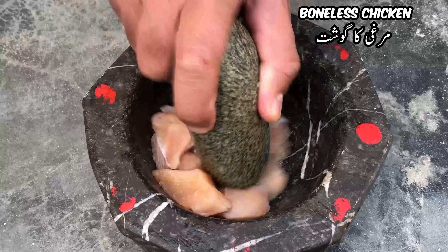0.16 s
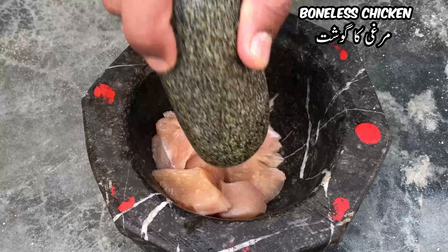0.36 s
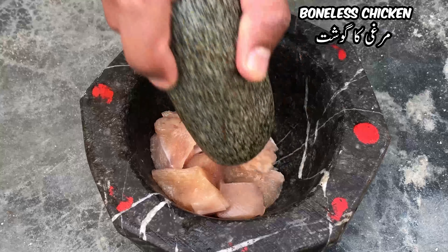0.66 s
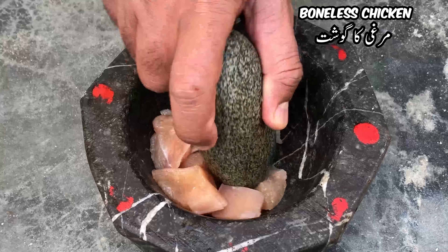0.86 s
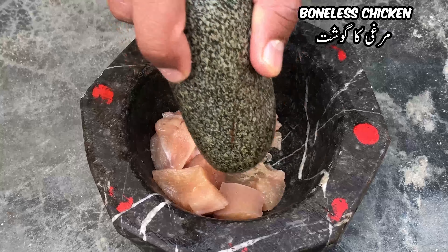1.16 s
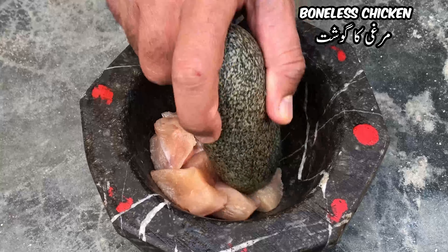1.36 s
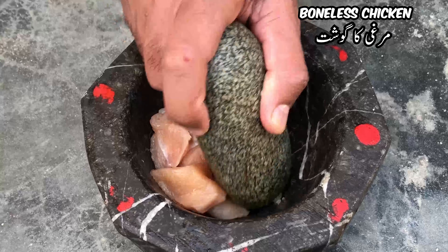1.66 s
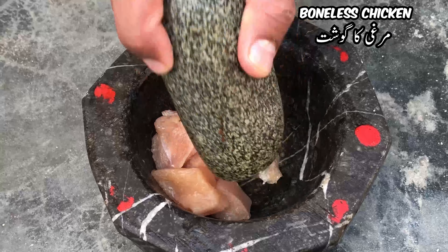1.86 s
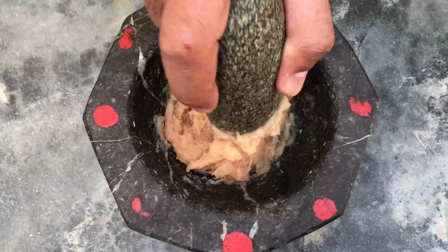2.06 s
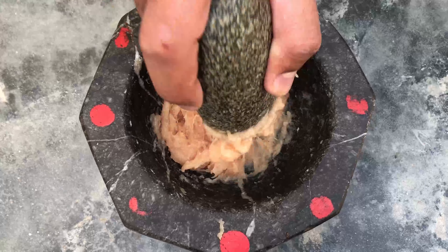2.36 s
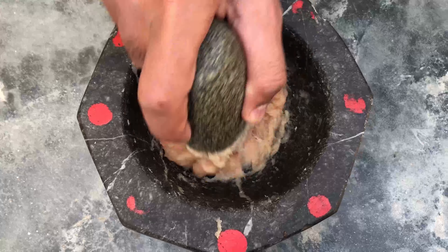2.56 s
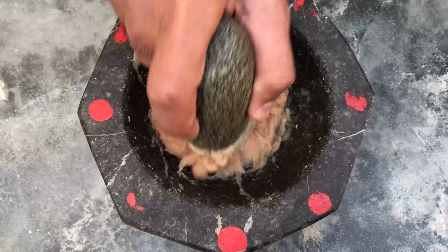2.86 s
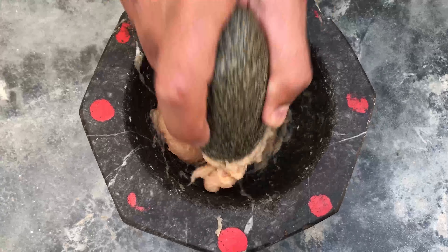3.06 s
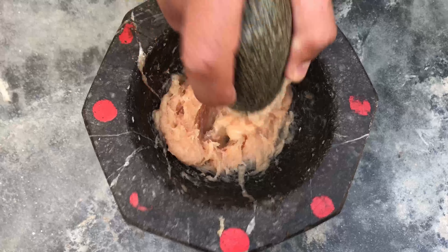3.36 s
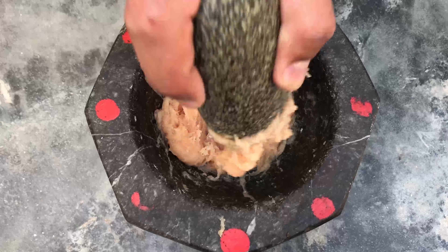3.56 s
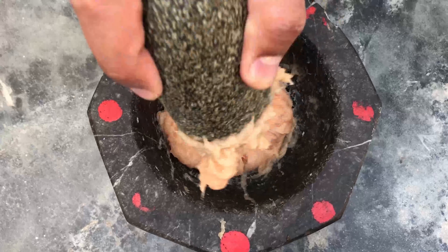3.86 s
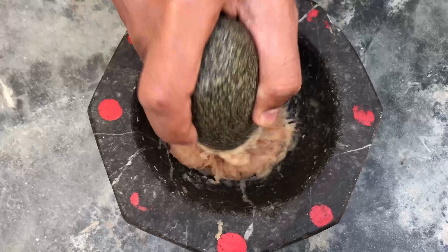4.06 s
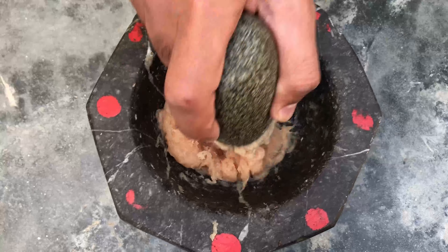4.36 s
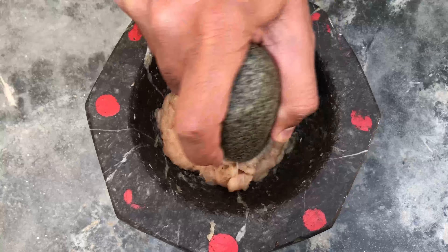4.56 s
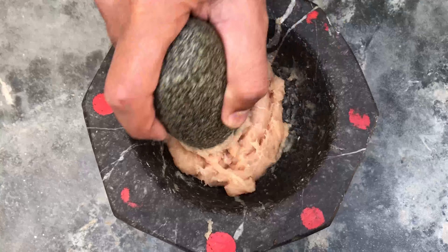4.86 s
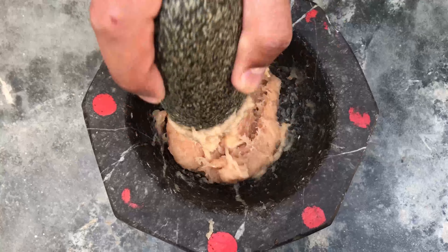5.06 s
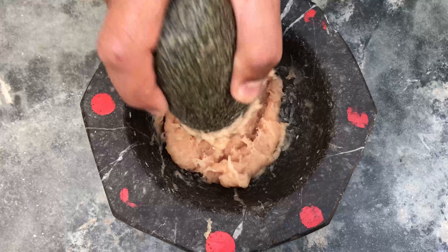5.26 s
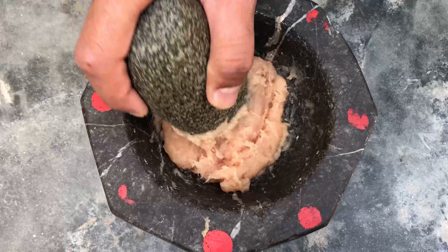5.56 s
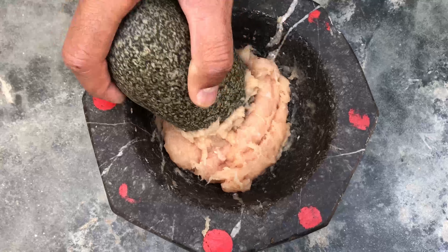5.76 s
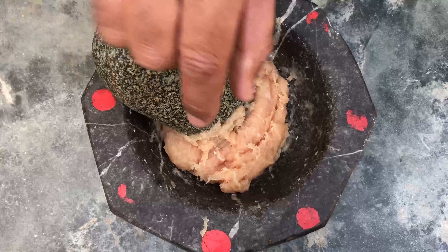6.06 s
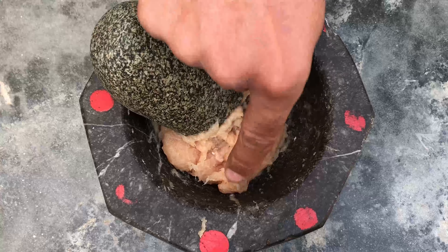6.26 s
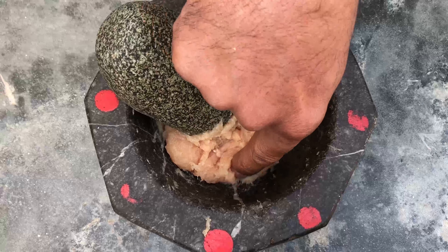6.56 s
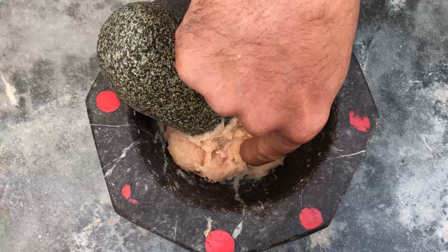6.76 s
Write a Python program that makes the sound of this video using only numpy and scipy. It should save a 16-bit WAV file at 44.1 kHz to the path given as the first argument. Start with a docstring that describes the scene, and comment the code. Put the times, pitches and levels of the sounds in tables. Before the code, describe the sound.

Steady, uneven pounding in a heavy stone bowl, heard from very near. Sharp juicy splats come first, with softer squishes and sticky peeling between, and a thin hiss behind. After two seconds the background is much quieter and stone knocks on stone, solid and dry, sometimes ringing briefly. Small air pockets plop in the paste. The last blows give way to fading taps, then faint wet clicks; the room answers only briefly.

```python
"""A stone pestle pounds raw chicken in a stone mortar, close up, at first over a faint fluttering hiss
and hum, about three strokes a second. Each stroke splats into the wet meat (noise crackle), squelches,
pops trapped air (short hollow plops) and peels free; the hard ones break through to the bowl, knock
stone on stone (filtered clicks) and ring the pestle (decaying sines). The kitchen answers briefly."""
import sys
import numpy as np
from scipy import signal
from scipy.fft import rfft, irfft, next_fast_len
from scipy.io import wavfile
from scipy.ndimage import map_coordinates

SR = 44100
rng = np.random.default_rng(int(sys.argv[2]) if len(sys.argv) > 2 else 0)


def transcribe(u):
    """Save the signal u as a 16-bit wav file named by the first command-line argument.

    u: samples, shape (n,) or (channels, n), limited to [-1, 1]; the rate is SR.
    q: integer samples, one column per channel.
    """
    v = np.clip(np.atleast_2d(u).T, -1, 1)
    q = np.round(v * 32767).astype(np.int16)
    wavfile.write(sys.argv[1], SR, q)


N = 304290
T = np.arange(N) / SR
FIRM_DB = -25  # level of a firm stroke or peel, the reference for its length


def amp(db):
    """Decibels to gain."""
    return 10 ** (np.asarray(db) / 20)


def unit(x):
    """Scaled to rms 1."""
    return x / np.sqrt(np.mean(x ** 2) + 1e-20)


def peak_at(x, db):
    """Scaled to this peak level."""
    return amp(db) * x / np.abs(x).max()


def along(points, hz):
    """(Hz, value) points read on a log frequency axis."""
    f, v = np.transpose(points)
    return np.interp(np.log(hz + 1), np.log(f), v)


def filtered(x, response):
    """x through a response given as a function of frequency."""
    size = next_fast_len(len(x) + SR // 4)
    hz = np.fft.rfftfreq(size, 1 / SR)
    return irfft(rfft(x, size) * response(hz), size)[:len(x)]


def impulse(gain, size=2048):
    """Minimum-phase click of energy 1 with this gain over frequency."""
    log_gain = np.log(np.maximum(gain(np.fft.rfftfreq(size, 1 / SR)), 1e-6))
    cepstrum = irfft(log_gain)
    # folding the cepstrum makes the click causal
    cepstrum[1:size // 2] *= 2
    cepstrum[size // 2 + 1:] = 0
    click = irfft(np.exp(rfft(cepstrum)))
    return click / np.linalg.norm(click)


def tilted(spectrum, tilt_db):
    """Click with this spectrum, tilted from -tilt_db at 1.5 kHz to +tilt_db at 9 kHz."""
    shelf = [(1500, -tilt_db), (9000, tilt_db)]
    return impulse(lambda hz: amp(along(spectrum, hz) + along(shelf, hz)))


def resonance(hz, centre_hz, gain_db, octaves):
    """Gain of a broad peak."""
    return amp(gain_db * np.exp(-(np.log2((hz + 1) / centre_hz) / octaves) ** 2))


def dispersed(click, lag_s):
    """Bending waves carry the lows more slowly, so a click falls in pitch; lag_s is the delay at 1 kHz."""
    return filtered(click, lambda hz: np.exp(-4j * np.pi * lag_s * np.sqrt(1000 * hz)))


def add(track, s, sound):
    """Mix a sound in from time s."""
    start = max(round(s * SR), 0)
    part = track[start:start + len(sound)]
    part += sound[:len(part)]


def noise(spectrum):
    """Coloured noise of rms 1."""
    white = rng.standard_normal(N)
    return unit(filtered(white, lambda hz: amp(along(spectrum, hz))))


def crackle(size, rate_hz, scatter_db):
    """Sparse impulses of random sign and uneven strength, rms 1."""
    hits = rng.random(size) < rate_hz / SR
    signs = rng.choice([-1, 1], size)
    strength = amp(scatter_db * rng.standard_normal(size).clip(-2, 2))
    return unit(hits * signs * strength)


# hum tones: pitch_hz, level_db (peak)
HUM_TONES = [(495, -102.5), (690, -94.5)]


def hum(stop_s=2.03, fade_s=0.025, waver_cycles=0.42):
    """Faint sines share a random phase drift and stop early on."""
    drift = waver_cycles * map_coordinates(rng.standard_normal(100), [12 * T])
    tones = sum(amp(db) * np.sin(2 * np.pi * (hz * T + drift)) for hz, db in HUM_TONES)
    return tones * np.clip((stop_s - T) / fade_s, 0, 1)


# hiss levels before the trims in hiss(), early and late: time_s, middle_db, treble_db
HISS_EARLY = [(0.0, -66.5, -69), (0.12, -68, -67.5), (0.38, -59.5, -62.5), (0.54, -67, -64.5),
              (0.74, -61.5, -59.5), (0.93, -60.5, -64.5), (1.14, -59.5, -62.5), (1.31, -58.5, -54.5),
              (1.54, -63, -61.5), (1.62, -61.5, -56.5), (1.74, -63, -58.5), (1.85, -67, -73),
              (1.98, -66, -69.5), (2.12, -82.5, -82.5)]
HISS_LATE = [(6.0, -79, -78), (6.348, -67.5, -72.5), (6.452, -79.5, -72.5), (6.696, -89, -82),
             (6.9, -84, -84.5)]
# spectra of the hiss middle, hiss treble and still air: freq_hz, gain_db
BODY = [(30, -50), (200, -38.5), (400, -32), (700, -18.5), (1100, -8), (1700, 0.5), (2600, 1), (3800, 4),
        (6000, -1.5), (9000, -10.5), (16000, -33.5)]
FIZZ = [(30, -55), (2000, -25.5), (5000, -10.5), (8000, -6), (11000, 0), (14500, 0.5), (16000, -6)]
AIR = [(30, -41), (200, -37.5), (450, -24.5), (800, -12.5), (1300, -3), (2000, -0.5), (3500, -8),
       (7000, -11), (16000, -13)]


def hiss(body_trim_db=-1, fizz_trim_db=1, air_db=-77, flutter_db=2.24, ticks_db=-9,
         rest_s=(2.2, 5.1), rest_middle_db=-76.5, rest_treble_db=-80):
    """Two noise bands swell and flutter, flecked with wet ticks, over the still air of the kitchen."""
    rest = [(s, rest_middle_db, rest_treble_db) for s in rest_s]
    s, *columns = np.vstack([HISS_EARLY, rest, HISS_LATE]).T
    body_db, fizz_db = [np.interp(T, s, column) for column in columns]
    flutter = flutter_db * map_coordinates(rng.standard_normal(300), [40 * T])  # 40 random points a second
    flecks = crackle(N, rate_hz=160, scatter_db=5)
    ticks = amp(ticks_db) * unit(filtered(flecks, lambda hz: amp(along(PEEL, hz))))
    middle = amp(body_db + body_trim_db + flutter) * (noise(BODY) + ticks)
    treble = amp(fizz_db + fizz_trim_db + flutter / 2) * noise(FIZZ)
    return middle + treble + amp(air_db) * noise(AIR)


# bands of hiss: centre_s, level_db, centre_hz, width_hz, spread_s
HISS_BANDS = [(.03, -63, 1610, 1170, 0.059), (1.246, -58, 4160, 2580, 0.048),
              (1.978, -72, 5640, 600, 0.025), (3.49, -62.5, 4440, 1084, 0.068),
              (5.2, -59.5, 4375, 2260, 0.052), (5.29, -58, 3646, 858, 0.056)]


def hiss_bands():
    """Faint Gaussian swells of band-limited hiss."""
    out = np.zeros(N)
    for s, db, centre_hz, width_hz, spread_s in HISS_BANDS:
        white = rng.standard_normal(N)
        band = unit(filtered(white, lambda hz: 1 / (1 + (2 * (hz - centre_hz) / width_hz) ** 4)))
        out += amp(db) * band * np.exp(-((T - s) / spread_s) ** 2 / 2)
    return out


# squeak glide: time_s, pitch_hz, level_db
SQUEAK = [(0.352, 1650, -83), (0.471, 1673, -71), (.62, 1680, -77), (.695, 1705, -60.5), (.76, 1900, -67),
          (1.051, 1800, -74), (1.2, 1800, -86)]


def squeak(width_hz=220):
    """A faint, rough squeak: narrow noise on a carrier that glides up, then partly back, and fades."""
    s, *columns = np.transpose(SQUEAK)
    centre_hz, db = [np.interp(T, s, column) for column in columns]
    slow = lambda: filtered(rng.standard_normal(N), lambda hz: 1 / (1 + (2 * hz / width_hz) ** 4))
    phase = 2 * np.pi * np.cumsum(centre_hz) / SR
    band = unit(slow() * np.cos(phase) + slow() * np.sin(phase))
    return amp(db) * band * (T > s[0]) * (T < s[-1])


# colours of the early scatter and tail, and of the slap: freq_hz, gain_db
ECHO = [(100, -2.5), (300, -4.5), (480, 9), (700, 7.5), (1100, -6), (1700, -5.5), (2300, -6), (4000, -12.5),
        (7000, -3), (16000, -12)]
SLAP = [(100, -10.5), (900, -10.5), (1700, 0.5), (2400, -4.5), (4500, -9.5), (16000, -9.5)]
# tail decay: freq_hz, t60_s
ROOM = [(200, .42), (1500, 0.57), (4000, 0.61), (12000, 0.34)]


def room(x, early_db=-16, early_s=0.032, slap_db=-20, slap_s=.0228, slap_spread_s=.0035, tail_db=-23):
    """Nearby scatter, a short slap echo and a weak tail as noise responses, redrawn every third of a second."""
    out, size, block = np.zeros(N), SR // 2, SR // 3
    t = np.arange(size) / SR
    echo, slap_colour = tilted(ECHO, 0), tilted(SLAP, 0)
    # each part has energy 1 before its level
    coloured = lambda v, colour: unit(signal.fftconvolve(v, colour)[:size]) / np.sqrt(size)
    for start in range(0, N, block):
        hz, when, z = signal.stft(rng.standard_normal(size), SR, nperseg=256)
        decay = amp(-60 * when / along(ROOM, hz)[:, None])
        tail = signal.istft(z * decay, SR, nperseg=256)[1][:size]
        tail = tail * (1 - np.exp(-t / 0.005))
        early = rng.standard_normal(size) * np.exp(-t / early_s) * (t > .002)
        slap = rng.standard_normal(size) * np.exp(-np.abs(t - slap_s) / slap_spread_s)
        answer = amp(early_db) * coloured(early, echo)
        answer += amp(tail_db) * coloured(tail, echo)
        answer += amp(slap_db) * coloured(slap, slap_colour)
        add(out, start / SR, signal.fftconvolve(x[start:start + block], answer))
    return out


# louder sticky films: start_s, level_db (peak before the trim), tilt_db
SNAPS = [(1.020, -33, 0.5), (1.369, -29, 7), (1.803, -32, 0.5), (2.188, -35, -1), (2.2368, -30.5, 39),
         (2.5553, -19, 6), (2.763, -24, 0.5), (4.617, -28, 1.5), (4.640, -26, -3), (4.754, -44.5, -10),
         (5.190, -28, -7.5), (5.983, -42, -6.5), (6.453, -43.5, -5.5), (6.508, -36.5, 13),
         (6.517, -36.5, 18), (6.603, -38, 18), (6.671, -42.5, 12)]


def snaps(trim_db=-2, trail_db=-13, trail_s=.002, faint_db=-52, faint_tilt_db=-3, scatter_db=3, count=20):
    """Films of juice snap: a click with a crackling trail; louder ones, and faint ones at any time."""
    out, t = np.zeros(N), np.arange(SR // 40) / SR
    faint = [(rng.random() * N / SR, faint_db + scatter_db * rng.standard_normal(), faint_tilt_db)
             for _ in range(count)]
    for s, db, tilt_db in [*SNAPS, *faint]:
        burst = amp(trail_db) * crackle(len(t), rate_hz=2000, scatter_db=7.5) * np.exp(-t / trail_s)
        burst[0] = 1
        snap = signal.fftconvolve(burst, tilted(PEEL, tilt_db))
        add(out, s, peak_at(snap, db + trim_db))
    return out


# air pockets, and a faint finger touch at 6.455 s: start_s, level_db (peak before the trim)
POPS = [(1.316, -55.5), (1.336, -54.5), (1.667, -59), (1.681, -47.5), (1.696, -58.5), (2.191, -51),
        (2.21, -57), (2.227, -53.5), (2.495, -56.5), (2.523, -56), (4.285, -46), (4.353, -27.5),
        (4.665, -48), (4.836, -51.5), (4.863, -57), (5.137, -38), (6.455, -66.5)]
# plop spectrum: freq_hz, gain_db
PLOP = [(30, -70), (150, -61), (280, -40.5), (450, -19), (600, -9), (800, -10), (1020, 3), (1250, -8),
        (1600, -19.5), (2100, -41.5), (5000, -60.5)]


def pops(trim_db=-1, rebound_s=0.006, rebound_db=-11, mashed_s=2,
         small_db=-61.5, scatter_db=3, after_s=0.033, within_s=.12, count=3):
    """An air pocket bursts with a hollow plop of a few cycles; its walls slap shut as a weaker second plop."""
    out = np.zeros(N)
    plop = peak_at(impulse(lambda hz: amp(along(PLOP, hz))), trim_db)
    # small pockets burst soon after a landing, once the meat has turned to paste
    landings = [s for s, *_ in STROKES if s > mashed_s]
    small = [(s + after_s + within_s * rng.random(), small_db + scatter_db * rng.standard_normal())
             for s in landings for _ in range(count)]
    for s, db in [*POPS, *small]:
        add(out, s, amp(db) * plop)
        shut_s = np.exp(0.28 * rng.standard_normal()) * rebound_s
        add(out, s + shut_s, amp(db + rebound_db) * plop)
    return out


def squelches(firm_level_db=-62.0, db_per_db=0.15, tilt_db=2, release_s=0.046):
    """While the pestle presses, the meat crackles softly; it settles after the lift."""
    out, t = np.zeros(N), np.arange(SR // 2) / SR
    for s, db, _, _, lift_s, _ in STROKES:
        release = np.exp(-np.maximum(t - lift_s, 0) / release_s)
        pressed = crackle(len(t), rate_hz=4100, scatter_db=4.5) * release
        level = amp(firm_level_db + db_per_db * (db - FIRM_DB))
        add(out, s, level * signal.fftconvolve(pressed, tilted(PEEL, tilt_db)))
    return out


# spectrum of tearing wet meat, also of ticks, snaps and squelches: freq_hz, gain_db
PEEL = [(30, -52), (350, -40.5), (700, -20), (1200, -3), (2400, 1), (4000, 2.5), (7500, -7.5),
        (11000, -8.5), (16000, -2)]


def peels(brighter_db=3.5, firm_spread_s=.0024, halves_db=12.5):
    """On the lift, sticky meat tears from the stone in a swell of fine crackle; louder is shorter."""
    out, t = np.zeros(N), np.arange(-SR // 8, SR // 8) / SR
    for s, _, _, tilt_db, lift_s, db in STROKES:
        spread_s = firm_spread_s * 2 ** ((FIRM_DB - db) / halves_db)
        tearing = crackle(len(t), rate_hz=2100, scatter_db=5) / np.cosh(t / spread_s)
        peel = signal.fftconvolve(tearing, tilted(PEEL, tilt_db + brighter_db))
        add(out, s + lift_s + t[0], amp(db) * peel)
    return out


# pestle lands in the meat and lifts again, spray and peel levels before their envelopes:
# start_s, splat_db, crack_db (peak), tilt_db, lift_after_s, peel_db
STROKES = [(0.1649, -27, -3.5, 5, 0.077, -49.5), (0.481, -26, -19, 2.5, 0.072, -49),
           (0.7888, -19, -13, 4, 0.084, -47), (1.093, -48.5, -49, 2.5, 0.16, -49),
           (1.287, -42.5, -46, 7.5, 0.064, -44.5), (1.635, -35.5, -38, 8, 0.1, -59),
           (2.168, -41.5, -41, -1.5, 0.11, -48), (2.466, -50.5, -52, -1.5, 0.094, -42),
           (2.768, -31.5, -17.5, -3, 0.083, -42.5), (3.076, -48, -31, -1.5, 0.081, -44),
           (3.3596, -42.5, -38, -3, 0.099, -52), (3.6775, -17, -7, -1, 0.056, -50.5),
           (3.9734, -39.5, -25, -0.5, 0.063, -53.5), (4.252, -31, -9, 0.5, .078, -42.5),
           (4.518, -36.5, -27.5, -2.5, .104, -39.5), (4.806, -53, -45, -1, 0.12, -42),
           (5.1178, -43, -23.5, -1.5, 0.096, -39), (5.4355, -24, -22, 4.5, 0.088, -56),
           (5.701, -31, -36, 0.5, 0.17, -66.5)]
# splat spectrum: freq_hz, gain_db
SPLAT = [(30, -47), (300, -41.5), (650, -30.5), (1100, 2.5), (1800, 0), (3000, 1.5), (4500, -2.5),
         (7000, -5), (11000, -7.5), (16000, -6.5)]


def splats(firm_spread_s=0.0026, halves_db=17.5, firm_gap_hz=4940, gap_doubles_db=25,
           gap_db=6, gap_octaves=0.19):
    """Juice spurts from under the pestle: a crackle spray and one sharp crack; harder is shorter.

    A harder stroke closes the gap under the pestle and raises its resonance."""
    out, t = np.zeros(N), np.arange(-SR // 20, SR // 10) / SR
    for s, db, crack_db, tilt_db, _, _ in STROKES:
        spread_s = firm_spread_s * 2 ** ((FIRM_DB - db) / halves_db)
        gap_hz = firm_gap_hz * 2 ** ((db - FIRM_DB) / gap_doubles_db)
        gap = impulse(lambda hz: resonance(hz, gap_hz, gap_db, gap_octaves))
        click = signal.fftconvolve(tilted(SPLAT, tilt_db), gap)
        spray = crackle(len(t), rate_hz=4200, scatter_db=4.0) * np.exp(-np.abs(t) / spread_s)
        add(out, s + t[0], amp(db) * signal.fftconvolve(spray, click))
        add(out, s + 0.00046, peak_at(click, crack_db))
    return out


def ring(t, hz, db, t60):
    """One decaying mode of the stone."""
    return amp(db - 60 * t / t60) * np.sin(2 * np.pi * hz * t)


# stone on stone, ring levels before damping:
# start_s, clack_db (peak), ring_db, linger_db, contact_corner_hz, bowl_hz (at the struck spot)
KNOCKS = [(2.7728, -6, -41, -64, 3160, 1650), (3.3597, -7, -8.5, -45.5, 3960, 2420),
          (3.68, -7, -21, -41, 2580, 1710), (3.9736, -6.5, -18, -36.5, 2790, 2160),
          (5.437, -8.5, -29, -60, 2630, 2100), (5.7031, -8, -30.5, -33, 2760, 2170),
          (5.7265, -26.5, -31.5, -49, 2000, 1650), (5.771, -24.5, -43, -58, 1612, 1530),
          (5.7937, -40.5, -64, -65, 1490, 1570), (5.8850, -51, -58.5, -58.5, 3020, 2000),
          (5.913, -53.5, -62, -66, 2980, 2000)]
# clack spectrum: freq_hz, gain_db
STONE = [(30, -56), (250, -51), (450, -34), (650, -23.5), (950, -5), (1250, 2), (2100, 3), (2700, 2),
         (3600, 3.5), (4600, 0), (5300, -21), (7000, -12), (16000, -17.5)]


def knocks(rebound_s=.0012, rebound_db=-8, grip_s=0.0027, held=0.44, lag_s=.0011,
           pestle_hz=4557, ring_t60=0.11, linger_t60=0.28,
           overtone_hz=10120, overtone_db=-24, overtone_t60=0.065):
    """The heavy bowl gives a dead clack; the pestle rings until hand and meat damp it."""
    out, t = np.zeros(N), np.arange(SR // 2) / SR
    grip = held + (1 - held) * np.exp(-t / grip_s)
    damping = grip * (1 - np.exp(-t / 0.00046))  # soft onset
    for s, db, ring_db, linger_db, corner_hz, bowl_hz in KNOCKS:
        bowl = lambda hz: amp(along(STONE, hz)) * resonance(hz, bowl_hz, 3, .35)
        # a film of meat lengthens the contact and dulls the clack
        contact = impulse(lambda hz: bowl(hz) / (1 + (hz / corner_hz) ** 3))
        clack = peak_at(dispersed(contact, lag_s), db)
        add(out, s, clack)
        # the clack bounces to and fro inside the bowl
        lateness, signs = rng.uniform(-0.35, .3, size=3), rng.choice([-1, 1], size=3)
        for k, (late, sign) in enumerate(zip(lateness, signs)):
            add(out, s + rebound_s * (k + 1 + late), sign * amp(rebound_db - 3.7 * k) * clack)
        # the pestle bends in two planes: the grip stops one quickly, the other lingers
        bending = ring(t, pestle_hz, ring_db, ring_t60) + ring(t, pestle_hz, linger_db, linger_t60)
        overtone = ring(t, overtone_hz, overtone_db + ring_db, overtone_t60)
        add(out, s + lag_s / 2, damping * (bending + overtone))
    return out


def scene(meat_room_db=-5, pop_room_db=-11):
    """The knocks fill the room; the meat sounds stay down in the bowl, the buried pops most of all."""
    stone, air = knocks(), pops()
    meat = splats() + squelches() + peels() + snaps()
    echoes = room(stone + amp(meat_room_db) * meat + amp(pop_room_db) * air)
    background = hiss() + hiss_bands() + squeak() + hum()
    return (stone + meat + air + echoes + background)[None]


def record(dry, top_hz=15950):
    """A steep low-pass removes all above the band limit."""
    return filtered(dry[0], lambda hz: 1 / (1 + (hz / top_hz) ** 120))[None]


dry = scene()
out = record(dry)
transcribe(out)
```